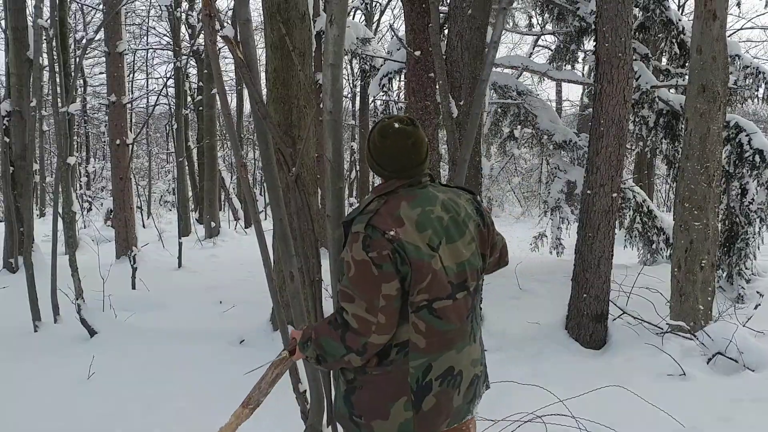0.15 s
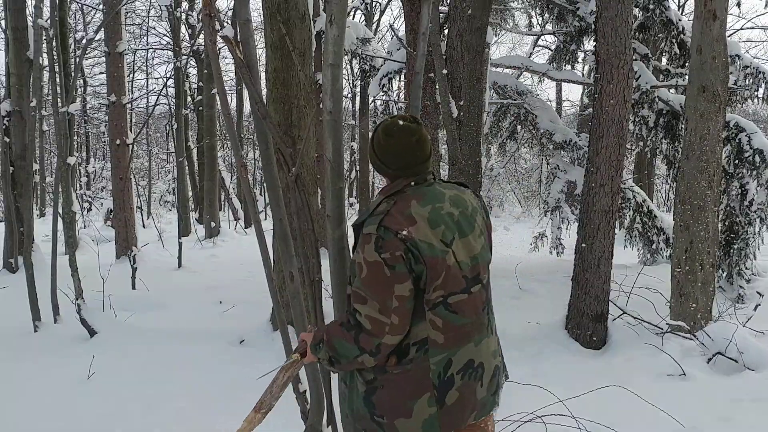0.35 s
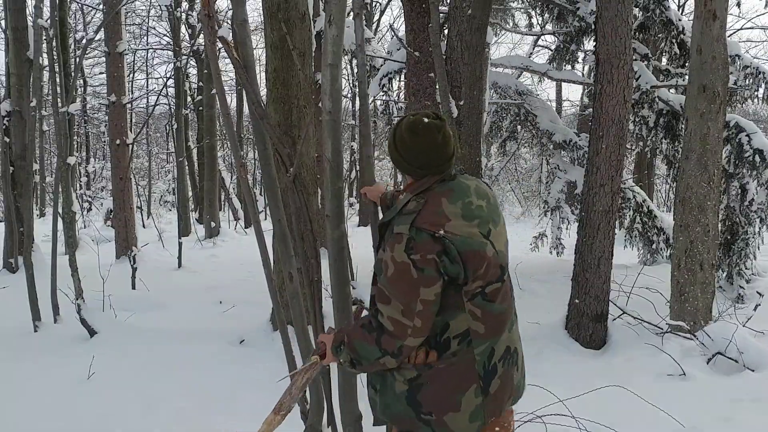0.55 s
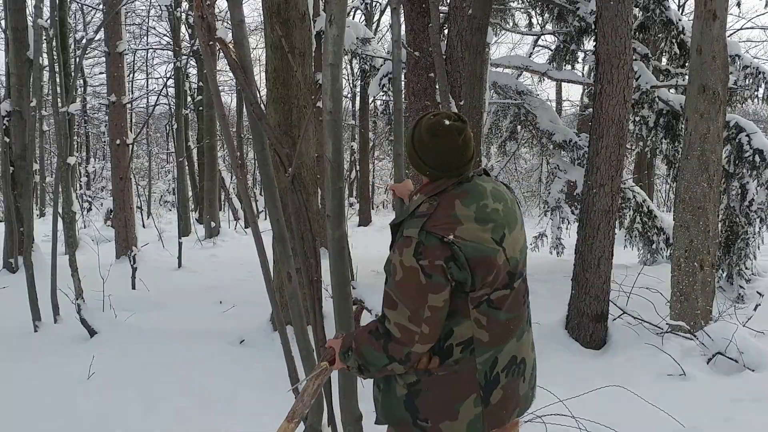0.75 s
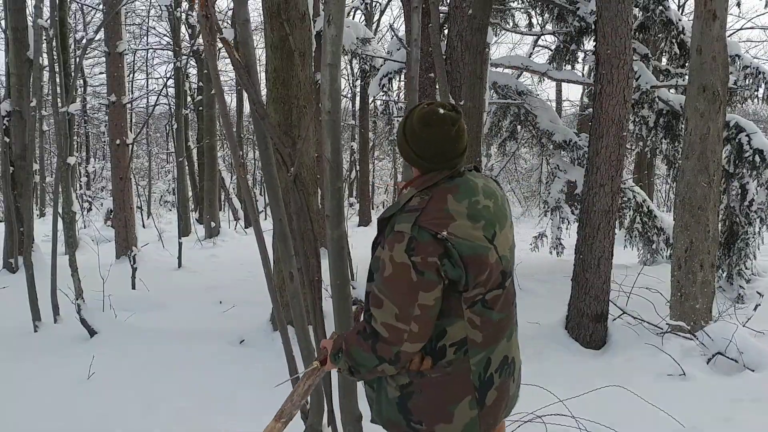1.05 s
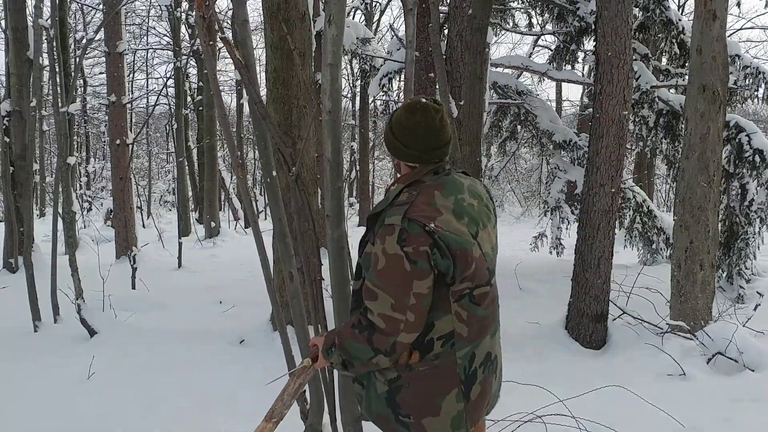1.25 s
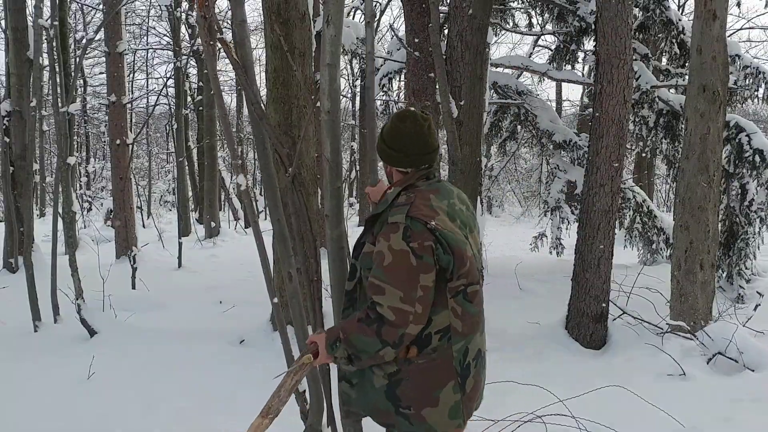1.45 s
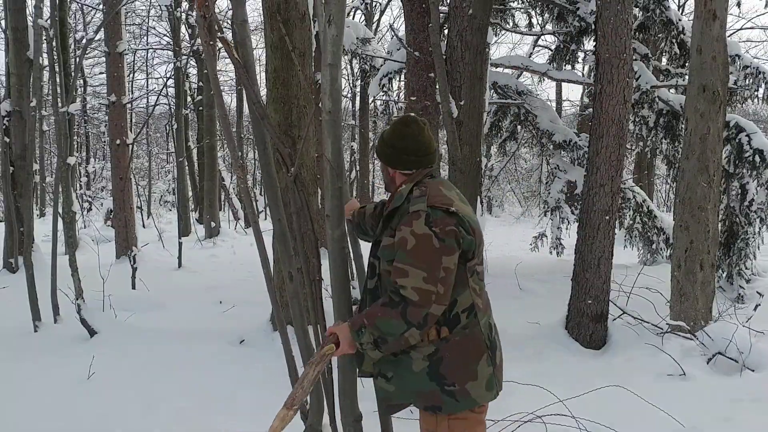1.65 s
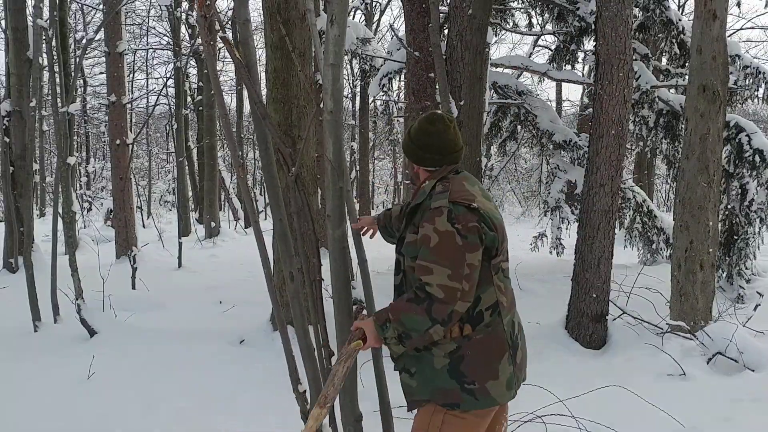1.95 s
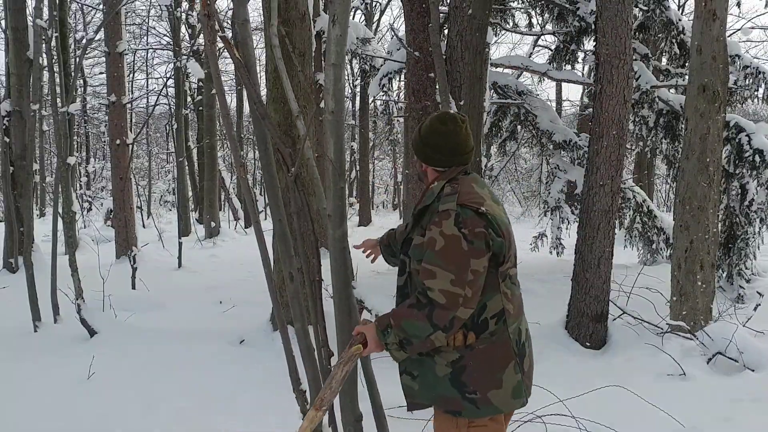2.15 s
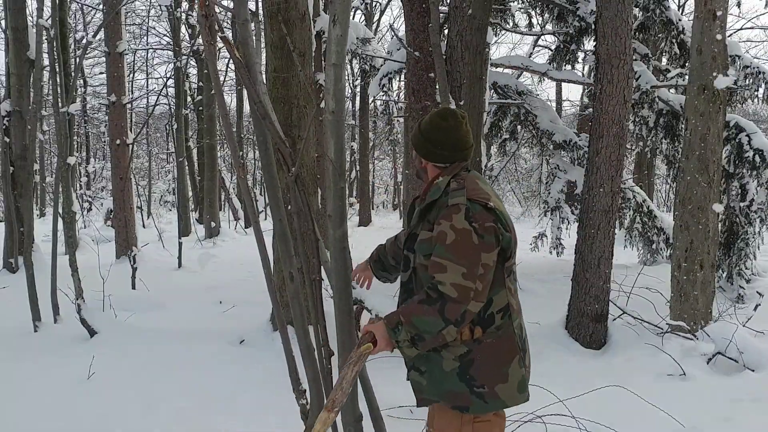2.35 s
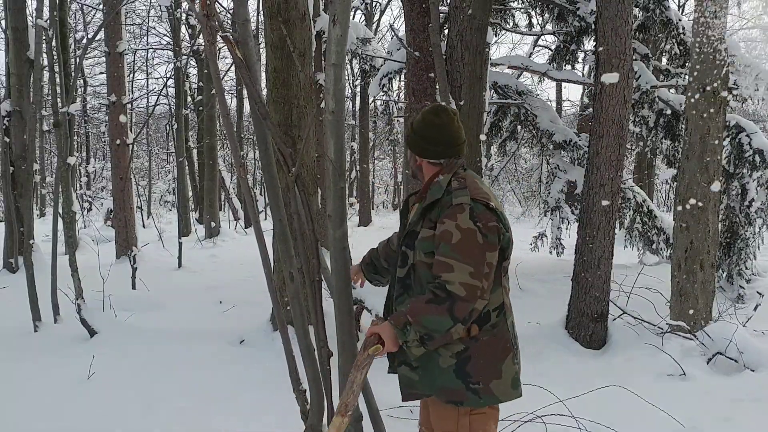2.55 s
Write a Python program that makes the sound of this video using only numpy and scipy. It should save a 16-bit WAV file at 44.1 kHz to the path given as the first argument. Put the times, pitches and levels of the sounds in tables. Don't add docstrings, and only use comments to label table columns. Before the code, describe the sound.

Wooden poles knock and rub together in a quiet snowy forest. Light raps and crunches build to sharp twig snaps at 0.4-0.5 s and the hardest woody knock near 0.66 s, with a thud at 0.8. Sparse knocks follow from 1.0 to 1.6 s. From 1.65 s scraping, clattering and crunching return, with hard cracks around 2.4 s, then fading raps. Crumbs sift over faint wind.

```python
import sys
import numpy as np
from scipy import signal
from scipy.io import wavfile

SR = 44100
rng = np.random.default_rng(int(sys.argv[2]) if len(sys.argv) > 2 else 0)


def undo_db(level):
    steps = np.asarray(level, float) / 20
    return 10 ** steps


def store_pcm(level_fs):
    pcm = np.round(np.clip(level_fs, -1, 1) * 32767).astype(np.int16)
    wavfile.write(sys.argv[1], SR, np.atleast_2d(pcm).T)


N = 119070


def rms_one(x):
    return x / np.sqrt(np.mean(x ** 2) + 1e-20)


def seconds(length_s):
    return np.arange(int(length_s * SR)) / SR


def in_time(rows, column=1):
    rows = np.array(rows)
    return np.interp(np.arange(N) / SR, rows[:, 0], rows[:, column])


def at_hz(points, hz):
    points = np.array(points)
    return np.interp(np.log(hz), np.log(points[:, 0]), points[:, 1])


def band(x, low_hz, high_hz):
    sos = signal.butter(2, [low_hz, min(high_hz, .45 * SR)], "band", fs=SR, output="sos")
    return signal.sosfilt(sos, x + 1e-18)


def tilt(x, top_db):
    top = signal.sosfilt(signal.butter(1, 9000, "high", fs=SR, output="sos"), x)
    return x + (undo_db(top_db) - 1) * top


def peak(x, hz, db, sharp):
    a, w = undo_db(db / 2), 2 * np.pi * hz / SR
    h = np.sin(w) / (2 * sharp)
    return signal.lfilter([1 + h * a, -2 * np.cos(w), 1 - h * a], [1 + h / a, -2 * np.cos(w), 1 - h / a], x)


def turn_phase(x, hz, sharp):
    w = 2 * np.pi * hz / SR
    h = np.sin(w) / (2 * sharp)
    return signal.lfilter([1 - h, -2 * np.cos(w), 1 + h], [1 + h, -2 * np.cos(w), 1 - h], x)


def ring(clicks, hz, t60):
    r, w = undo_db(-60 / (t60 * SR)), 2 * np.pi * hz / SR
    return signal.lfilter([0, np.sin(w)], [1, -2 * r * np.cos(w), r * r], clicks + 1e-18)


def pair(x, lag):
    return np.array([x, np.roll(x, lag)])


def add(out, s, sound):
    i = int(s * SR)
    out[..., i:i + sound.shape[-1]] += sound[..., :N - i]


def drift(rate):
    r = np.exp(-80 * np.pi * rate / SR)
    slow = signal.lfilter([1], [1, -2 * r, r * r], rng.standard_normal(N // 40 + 2002))[2000:]
    return np.interp(np.arange(N) / 40, np.arange(len(slow)), rms_one(slow))


def grains(per_s, spread_db, clump_db):
    sizes = undo_db(spread_db * np.minimum(rng.exponential(1, N), 3.5)) * rng.choice([-1, 1], N)
    density = per_s * undo_db(clump_db * (drift(12) + drift(40)))
    return sizes * (rng.random(N) < density / SR)


def coloured(sources, spectrum, low_hz, count):
    edges = low_hz * 2 ** (np.arange(count + 1) / 2)
    total = 0
    for k, (low, high) in enumerate(zip(edges, edges[1:])):
        level_db = at_hz(spectrum, np.sqrt(low * high)) + 2 * drift(40) + 2 * drift(5)
        total = total + undo_db(level_db) * band(sources[k % 2], low, high)
    return rms_one(total)


# frequency in Hz, level in dB.
WIND_SPECTRUM = [(40, -28), (60, -2), (110, -1), (200, -3.5), (300, -13), (450, -7.5), (600, -14)]


def wind():
    level_db, follows_rub, alike = -55.5, 0.74, 0.92
    white = rng.standard_normal((2, 2, N))
    shared, opposed = white[:, :1], white[:, 1:] * [[1], [-1]]
    air = np.sqrt(1 + alike) * shared + np.sqrt(1 - alike) * opposed
    rub_db = in_time(RUB_PRESSURE)
    gust_db = level_db + follows_rub * (rub_db - rub_db.mean()) + 2 * drift(0.83)
    return undo_db(gust_db) * coloured(air, WIND_SPECTRUM, 36.1, count=8)


def loosened():
    level_db, t60_s = -37, 0.12
    out, t = np.zeros(N), seconds(.25)
    for s, db, *_ in KNOCKS:
        add(out, s, undo_db(db / 2 + level_db - 60 * t / t60_s) * (1 - np.exp(-t * 200)))
    return out


# time in seconds, level of sifting crumbs in dB, top end in dB.
SHAKE = [(0, -61, 3), (.08, -46.5, -34), (.24, -43, 4.5), (.33, -53.5, -16), (.36, -45, -40),
         (.52, -31, -3), (.64, -38.5, -3), (.8, -40.5, 1.5), (.9, -56.5, 8.5), (.95, -36.5, 3),
         (1.18, -56.5, 7.5), (1.47, -53, 1), (1.6, -66, 9), (1.64, -43.5, 1.5), (2.2, -37, 3.5),
         (2.45, -39.5, -1), (2.56, -62.5, 8), (2.62, -46, -25)]
# frequency in Hz, level in dB per Hz.
SIFT_SPECTRUM = [(1500, -9.5), (3000, -1.5), (5000, -4.5), (8000, 4), (12000, -4), (16000, 1.5)]


def crumbs():
    crackle_db, sift_db, still_db = -4.5, -2.5, -71.5
    spots = [pair(grains(1700, 9.5, clump_db=3), lag) for lag in (4, 10)]
    crackle = signal.lfilter([1], [1, -.3], spots[0] + spots[1])
    snow = rng.standard_normal((2, 2, N))
    both = undo_db(crackle_db) * coloured([crackle, crackle], SIFT_SPECTRUM, 1640, count=7)
    both = both + undo_db(sift_db) * coloured(snow, SIFT_SPECTRUM, 1344, count=7)
    shaken = undo_db(in_time(SHAKE) + 2 * drift(22))
    return (shaken + loosened() + undo_db(still_db)) * tilt(both, in_time(SHAKE, column=2))


# start in seconds, peak level in dB.
THUDS = [
    (0.214, -34),
    (0.558, -40.5),
    (0.66, -41),
    (0.831, -32.5),
    (1.004, -47),
    (1.732, -45),
    (1.926, -43.5),
    (2.05, -34.5),
    (2.072, -44.5),
    (2.184, -50),
]


def thuds():
    centre_hz, t60_s, level_db, rise_s = 128, 0.12, 2.5, 0.019
    out, t = np.zeros(N), seconds(.2)
    for (s, db), noise in zip(THUDS, rng.standard_normal((len(THUDS), len(t)))):
        shape = undo_db(db + level_db - 60 * t / t60_s) * (1 - np.exp(-t / rise_s))
        add(out, s, shape * rms_one(band(noise, centre_hz * 1.3, centre_hz * 3.04)))
    return out


# time in seconds, level in dB.
RUB_PRESSURE = [(0, -59), (.1, -49), (.32, -52), (.35, -46), (.6, -38), (.82, -45.5), (.95, -46.5),
                (1.22, -53), (1.52, -52), (1.61, -57), (1.64, -42.5), (1.8, -39), (1.89, -36.5),
                (2.05, -44.5), (2.2, -40.5), (2.45, -44.5), (2.57, -46), (2.63, -47)]


def bark():
    level_db, grit_db, ring_cycles = -5, -7, 24.7
    ticks = grains(700, 2, clump_db=3.5)
    dealt = rng.integers(0, 16, N)
    rings = np.zeros(N)
    for k, hz in enumerate(np.geomspace(560, 1650, num=16)):
        rings += ring(ticks * (dealt == k), hz, ring_cycles / hz)
    grit = band(ticks + rng.standard_normal(N), 1500, 4540)
    return undo_db(in_time(RUB_PRESSURE) + level_db) * (rms_one(rings) + undo_db(grit_db) * rms_one(grit))


# start in seconds, length in seconds, level in dB, top end in dB.
CRUNCHES = [(0.081, 0.019, -39.5, -18), (0.239, 0.012, -34.5, -21), (.355, 0.011, -35, -20),
            (0.411, 0.026, -36, -32), (0.497, 0.054, -35, -2), (.56, .015, -34, -18),
            (0.581, .008, -31, -8), (.724, 0.0093, -26, -3), (0.757, 0.0046, -29.5, 9.5),
            (0.78, 0.013, -32.5, 12), (0.934, .012, -45, 10), (1.154, 0.007, -38.5, 8),
            (1.663, 0.0037, -40.5, 16), (1.719, .005, -34.5, 11), (1.848, .009, -27.5, 0.5),
            (1.864, 0.028, -31, -1.5), (1.927, 0.0088, -34, -7), (1.957, 0.013, -31.5, -10),
            (1.974, 0.028, -31, 2), (2.053, 0.02, -37, 16.5), (2.18, 0.055, -28, -14),
            (2.33, 0.0091, -35, -3), (2.4, 0.048, -44, 1), (2.439, 0.015, -43, 7)]


def crunches():
    low_hz, tail_db, tail_t60_s, unevenness = 3820, -19.5, 0.076, .9
    out, t = np.zeros((2, N)), seconds(.125)
    for (s, length, db, top_db), noise in zip(CRUNCHES, rng.standard_normal((len(CRUNCHES), 4, len(t)))):
        swell = np.sin(np.pi * np.clip(t / length, 0, 1))
        trickle = undo_db(tail_db - 60 * np.maximum(t - length, 0) / tail_t60_s)
        shape = np.sqrt(swell ** 2 + trickle ** 2 * np.minimum(t / length, 1))
        spray = rms_one(noise[0] * np.exp(unevenness * noise[1]))
        spray = pair(spray, 10) + 1.17 * noise[2:]
        add(out, s, undo_db(db) * tilt(band(shape * spray, low_hz, 26000), top_db))
    return out


# start in seconds, peak level in dB, top end in dB.
SNAPS = [(0.1837, -28, -2), (0.225, -23.5, -36), (0.3561, -28, -30), (0.417, -18, -29), (0.4272, -21, -33),
         (0.4317, -6, -30), (0.4934, -23.5, -5), (0.5036, -9.5, -29), (0.6648, -18.5, -17),
         (0.6857, -19, -1), (0.7281, -26, 5), (0.7547, -21, 5), (0.7812, -34, 9), (0.9322, -33.5, 9.5),
         (1.49, -37, 18), (1.618, -48.5, 19.5), (1.7033, -24.5, 8.5), (1.7245, -22, -20),
         (1.846, -22.5, 9.5), (1.9239, -26.5, 14), (1.9646, -15, -6), (2.0606, -31, 17.5), (2.173, -18, -2),
         (2.1829, -13, -6), (2.2124, -25, -27), (2.3473, -32, 9), (2.389, -9.5, -18), (2.3969, -6.5, -1.5),
         (2.4159, -17, -16), (2.6327, -25.5, -23.5)]
# start in seconds, peak level in dB.
TICKS = [(0.203, -16), (0.2773, -19.5), (0.517, -12), (0.611, -12), (0.68, -14), (0.7049, -9.5),
         (0.793, -18), (0.887, -24), (0.963, -26), (1.06, -34), (1.1381, -28.5), (1.4354, -25.5),
         (1.6709, -17), (1.813, -17), (1.8764, -22), (1.9364, -7), (2.02, -20), (2.0363, -21.5),
         (2.1196, -19), (2.1886, -28), (2.1998, -13.5), (2.25, -13), (2.2856, -15), (2.3224, -17.5),
         (2.366, -26), (2.597, -17.5), (2.612, -11.5), (2.6469, -11.5)]


def snaps():
    level_db, rise_s, debris_db, debris_t60_s = 3, .00045, -18, .09
    out, t = np.zeros((2, N)), seconds(1 / 6)
    shake_top_db = in_time(SHAKE, column=2)
    rows = list(SNAPS) + [(s, db - 14.5, shake_top_db[int(s * SR)] + 7.5) for s, db in TICKS]
    for (s, db, top_db), noise in zip(rows, rng.standard_normal((len(rows), 3, len(t)))):
        crack = np.sign(noise[0]) * t / rise_s * np.exp(1 - t / rise_s)
        lumps = .2 + .5 * noise[0] ** 2
        debris = undo_db(debris_db - 60 * t / debris_t60_s) * noise[1:] * lumps
        sound = band(pair(crack, 11) + debris, 5170, 26000)
        add(out, s + 0.00099, undo_db(db + level_db) * tilt(sound, top_db - 1))
    return out


# start in seconds, peak level in dB, pitch in Hz, brightness in dB.
KNOCKS = [(0.086, -25.5, 855, -16), (0.347, -29, 840, -21), (0.375, -25, 880, -20),
          (0.429, -25.5, 1246, -1.5), (0.563, -18, 906, -12.5), (0.6614, -6.5, 1207, -15.5),
          (0.726, -22, 1310, -11.5), (0.761, -18, 1300, -46), (0.8415, -22, 483, -48),
          (0.874, -24, 1403, -17), (1.157, -20, 1117, -18.5), (1.248, -26, 870, -48),
          (1.348, -23.5, 970, -41), (1.432, -33.5, 1087, -20), (1.499, -32.5, 850, -21),
          (1.637, -22.5, 1317, -37), (1.767, -29, 900, -12), (1.822, -25.5, 1440, -10),
          (1.842, -19.5, 1156, -14.5), (1.879, -14.5, 1390, -17), (1.898, -18.5, 1180, -19),
          (1.936, -34.5, 920, 1.5), (1.967, -24, 1165, -3.5), (2.189, -22.5, 1156, -5.5),
          (2.207, -19, 1364, -10.5), (2.29, -27, 840, -22.5), (2.391, -24.5, 1110, -8),
          (2.398, -12, 1000, -41), (2.587, -27, 910, -12)]
# start in seconds, peak level in dB, pitch in Hz.
RAPS = [(0.142, -29, 1380), (0.495, -31, 840), (0.744, -21.5, 1330), (0.804, -23.5, 1200),
        (0.865, -21.5, 680), (0.885, -28, 869), (0.93, -32, 1300), (1.057, -34, 1230), (1.469, -37, 830),
        (1.583, -39, 945), (1.631, -29.5, 860), (1.725, -30, 1150), (1.747, -27.5, 1020),
        (2.054, -32.5, 630), (2.173, -22.5, 1150), (2.214, -20.5, 1320), (2.304, -23, 850),
        (2.376, -33.5, 1070), (2.406, -19, 1220), (2.45, -26, 1270), (2.491, -34, 950), (2.549, -34, 1060),
        (2.634, -23.5, 1060), (2.678, -48, 940)]
# ratio to the pitch, level in dB, decay (T60) in seconds.
POLE_MODES = [(.6, -22.5, 0.03), (.74, -20, 0.043), (.87, -26, 0.012), (1.0, -11.5, 0.039),
              (1.2, -10.5, 0.012), (1.36, -8.5, 0.013)]
# ratio to the pitch, level in dB, decay (T60) in seconds.
POLE_HIGH_MODES = [(1.9, 7.4, 0.0055), (2.4, 10.93, 0.0037), (3.0, 1.3, 0.0027)]


def knocks():
    level_db, rattle_db, rattle_t60_s = -3, -31, .1
    out, t = np.zeros(N), seconds(.2)
    rows = list(KNOCKS) + [(s, db - 3.5, hz, -15) for s, db, hz in RAPS]
    for s, db, hz, bright_db in rows:
        noise = rng.standard_normal(len(t))
        contact = np.exp(-((t - .001) / .0001) ** 2) / 9 + .11 * noise * undo_db(-60 * t / .022)
        hit = contact + undo_db(rattle_db - 60 * t / rattle_t60_s) * noise
        modes = list(POLE_MODES) + [(ratio, d + bright_db, t60) for ratio, d, t60 in POLE_HIGH_MODES]
        for ratio, mode_db, t60 in modes:
            luck_db = 2 * rng.standard_normal()
            add(out, s + 0.001061, undo_db(db + level_db + mode_db + luck_db) * ring(hit, hz * ratio, t60))
    return band(band(out, 465, 9500), 465, 9500)


# delay in seconds, level in dB.
ECHOES = [(.011, -9.5), (.023, -14.5), (.041, -22.5)]


def scene():
    wood = knocks() + bark() + thuds()
    near = np.array([wood, turn_phase(wood, 1870, 4.4)]) + snaps() + crunches()
    dull = band(near, 234, 4300)
    for k, (s, db) in enumerate(ECHOES):
        add(near[k % 2], s, undo_db(db) * dull[0])
        add(near[1 - k % 2], s * 1.3, undo_db(db) * dull[1])
    return near + crumbs() + wind()


def top_cut(x):
    return signal.sosfilt(signal.butter(12, 16990, fs=SR, output="sos"), x)


# frequency in Hz, boost or cut in dB, sharpness (Q).
LEFT_PORT = [(1300, 3, 0.54), (7280, 7, 2.3), (8805, -14, 3.85), (9870, 11, 2.12)]
# frequency in Hz, boost or cut in dB, sharpness (Q).
RIGHT_PORT = [(1300, 6.5, 0.7), (6430, 9.5, 4.6), (9380, -11, 11), (14000, -10.5, 0.66)]


def record(dry):
    sides = []
    for x, port in zip(dry, (LEFT_PORT, RIGHT_PORT)):
        for hz, db, sharp in port:
            x = peak(x, hz, db, sharp)
        sides.append(x)
    treble_end = signal.cheby2(12, 35, 16100, fs=SR, output="sos")
    mix = signal.sosfilt(treble_end, np.clip(sides, -.92, .92))
    return top_cut(mix)


dry = scene()
out = record(dry)
store_pcm(out)
```